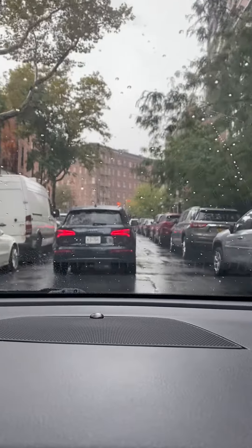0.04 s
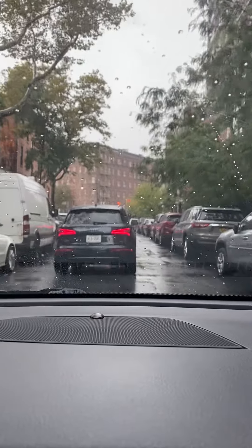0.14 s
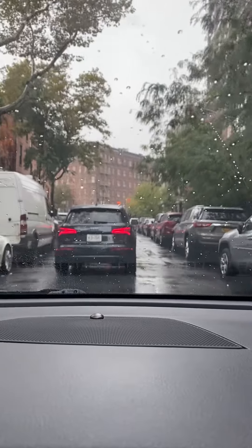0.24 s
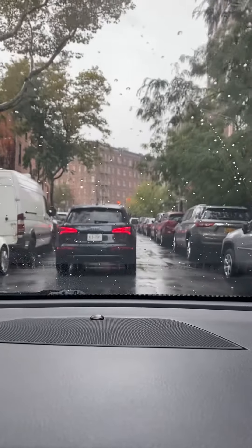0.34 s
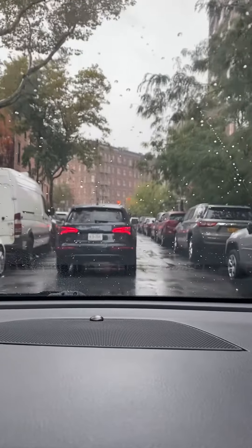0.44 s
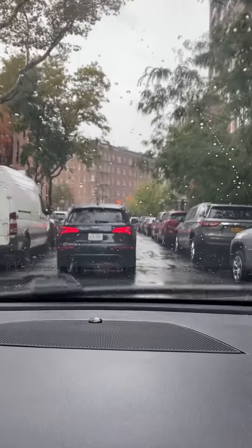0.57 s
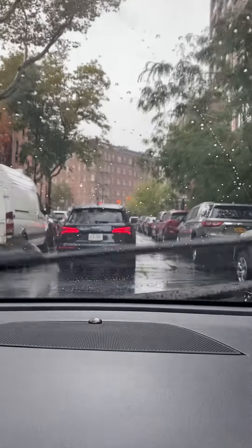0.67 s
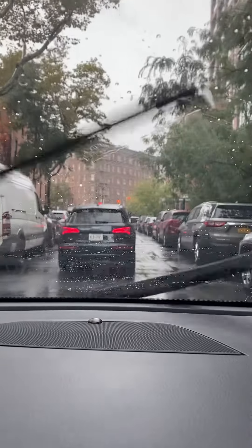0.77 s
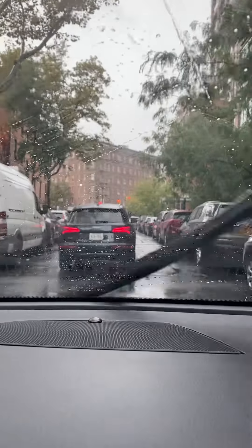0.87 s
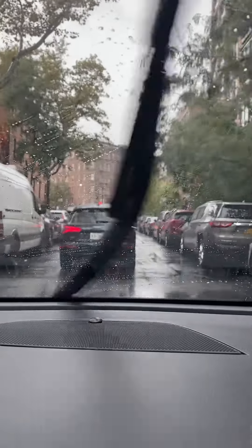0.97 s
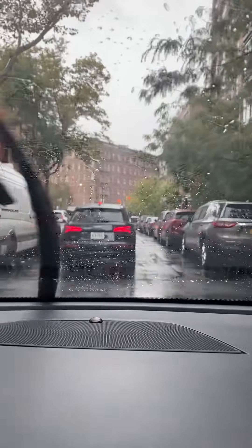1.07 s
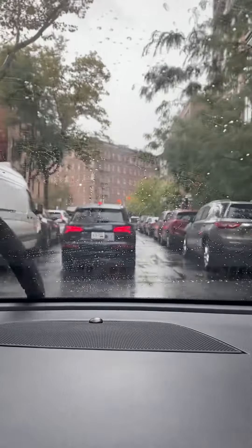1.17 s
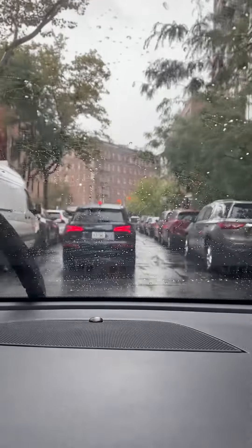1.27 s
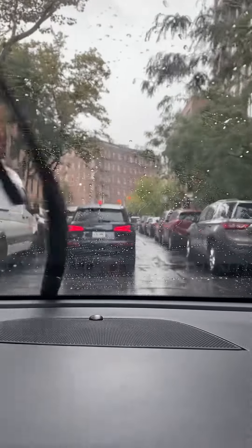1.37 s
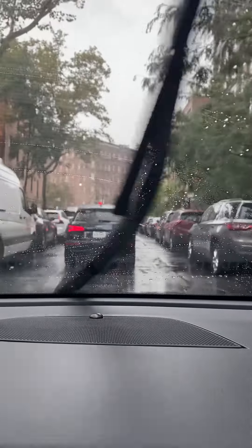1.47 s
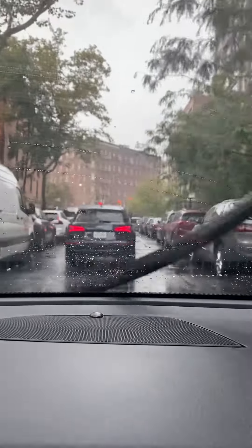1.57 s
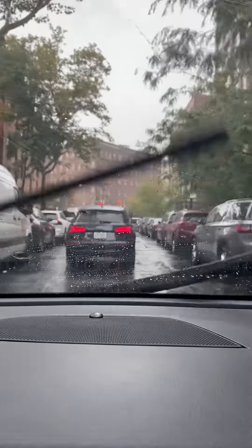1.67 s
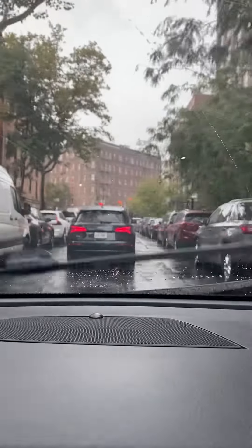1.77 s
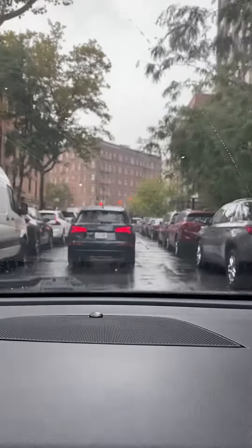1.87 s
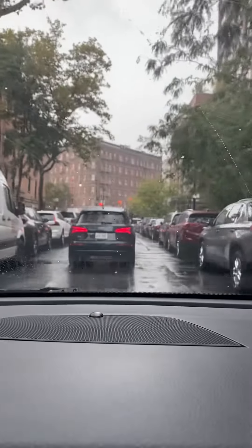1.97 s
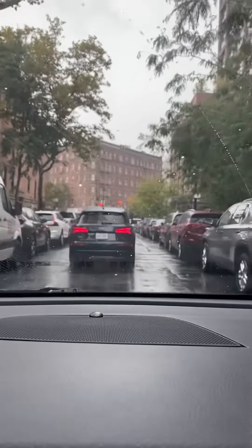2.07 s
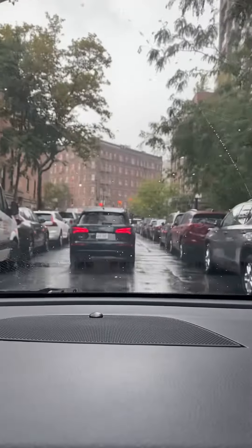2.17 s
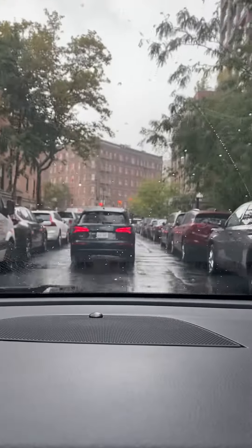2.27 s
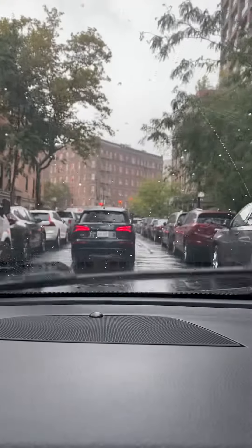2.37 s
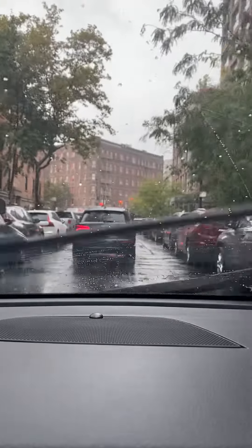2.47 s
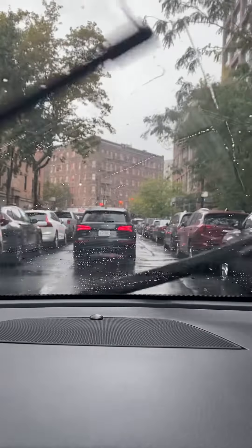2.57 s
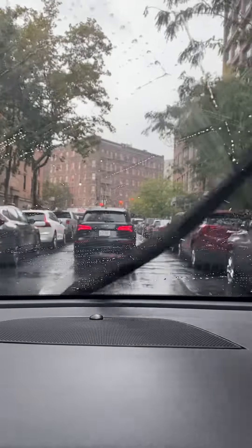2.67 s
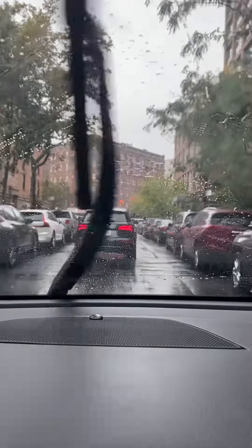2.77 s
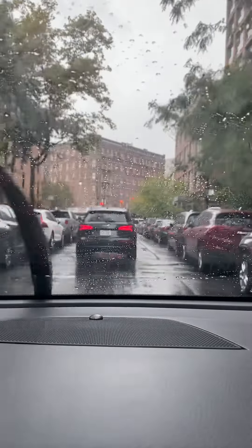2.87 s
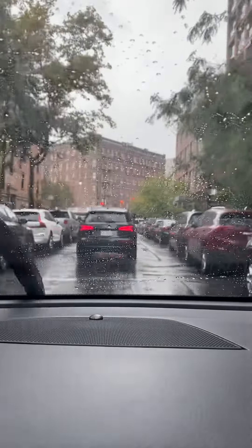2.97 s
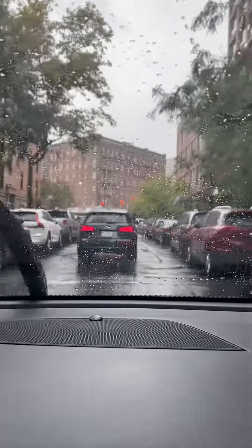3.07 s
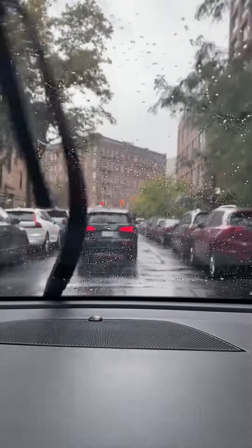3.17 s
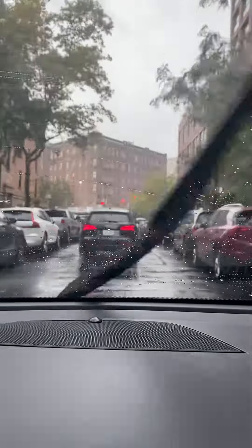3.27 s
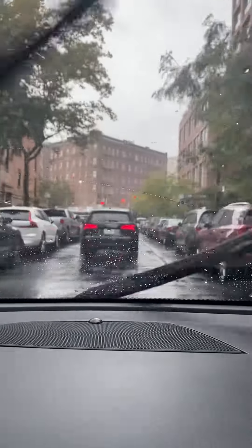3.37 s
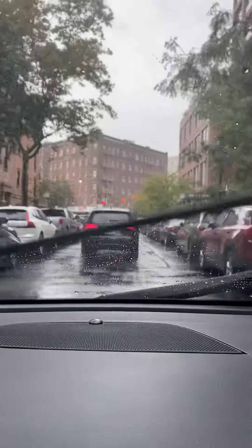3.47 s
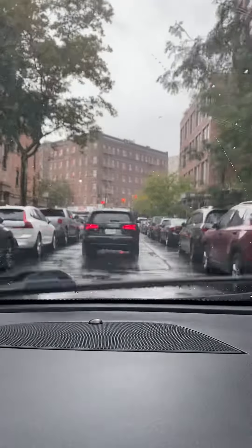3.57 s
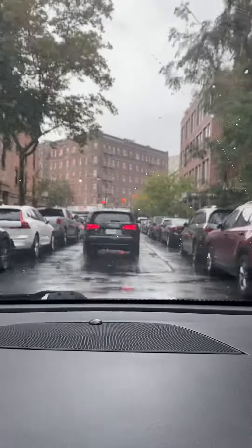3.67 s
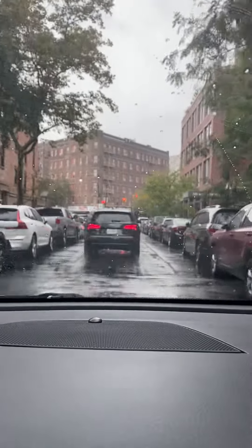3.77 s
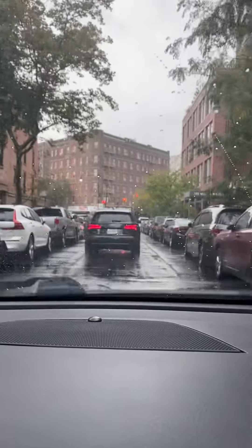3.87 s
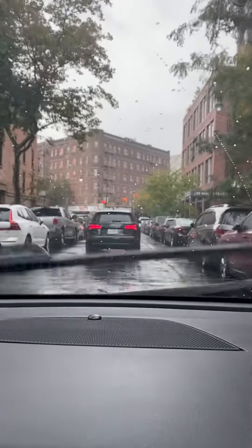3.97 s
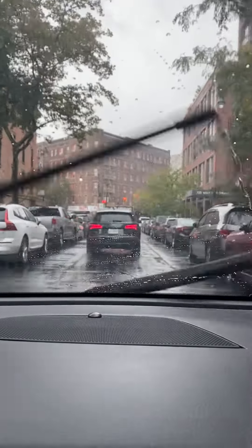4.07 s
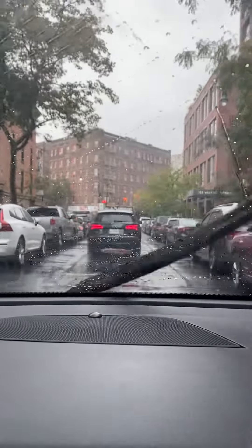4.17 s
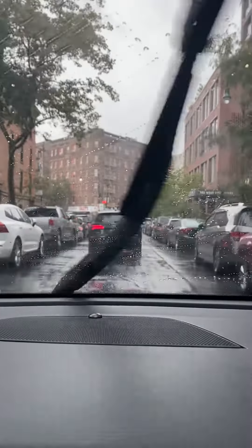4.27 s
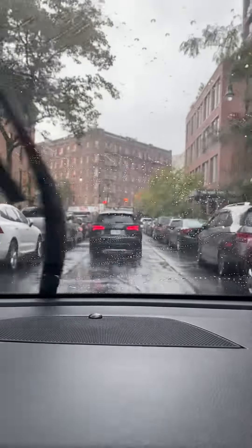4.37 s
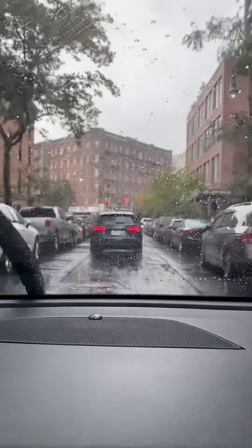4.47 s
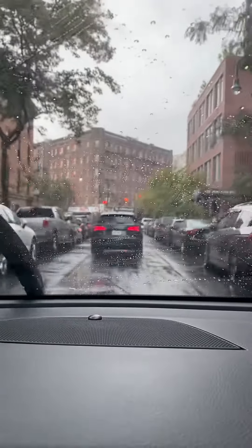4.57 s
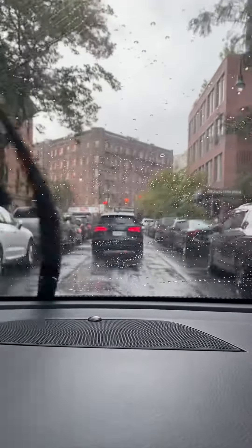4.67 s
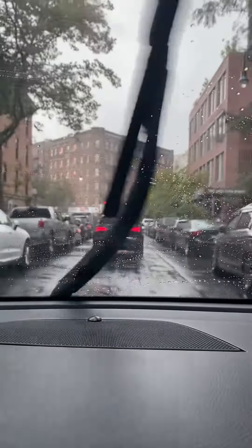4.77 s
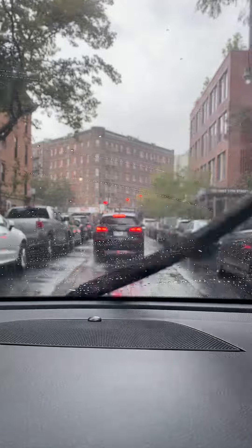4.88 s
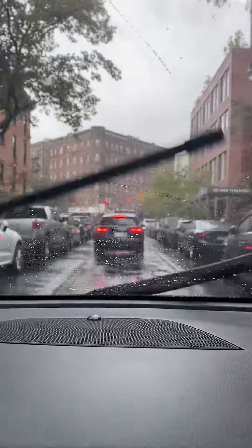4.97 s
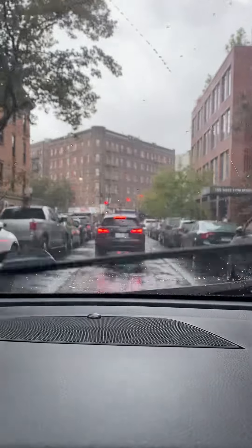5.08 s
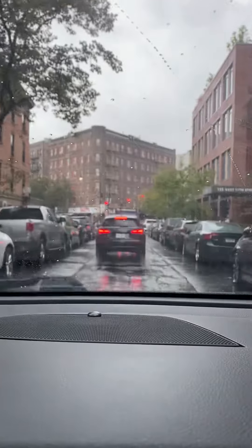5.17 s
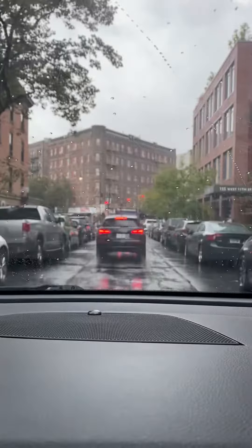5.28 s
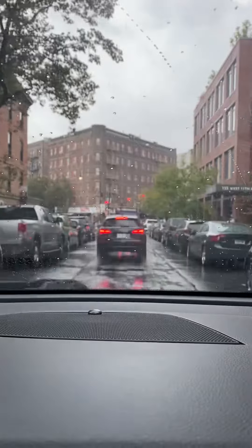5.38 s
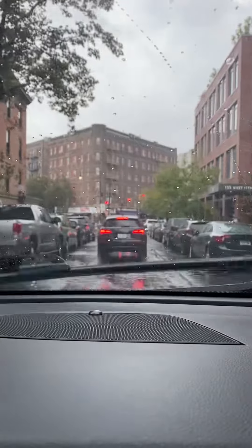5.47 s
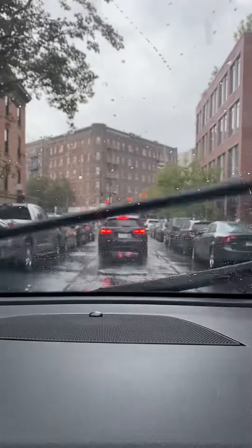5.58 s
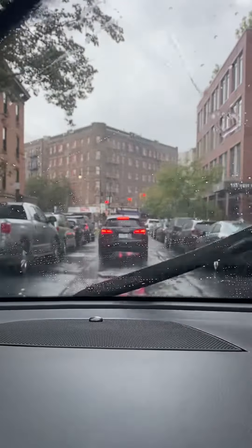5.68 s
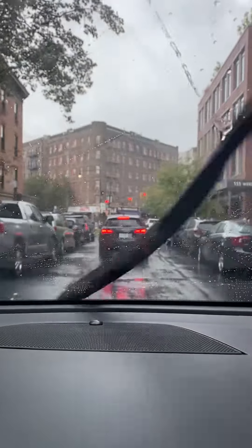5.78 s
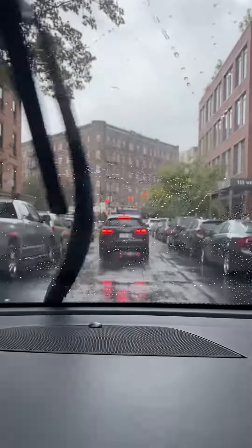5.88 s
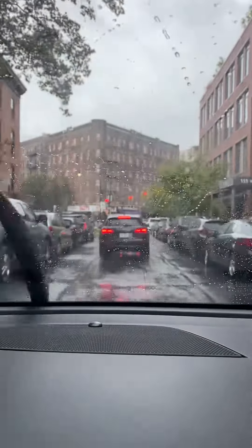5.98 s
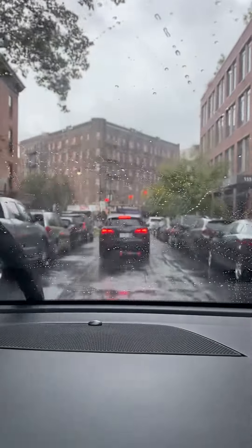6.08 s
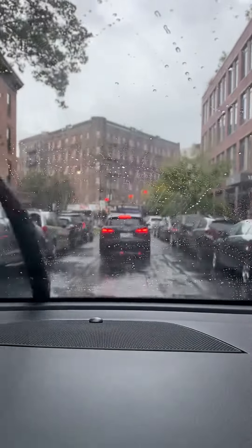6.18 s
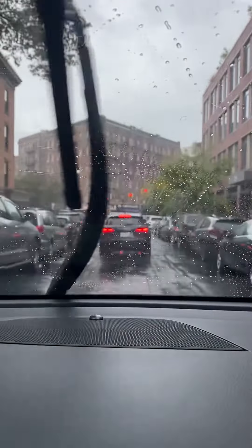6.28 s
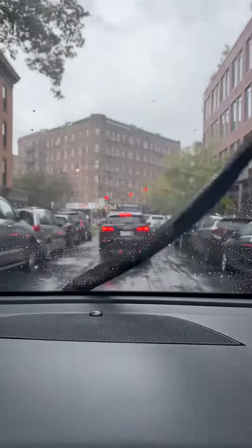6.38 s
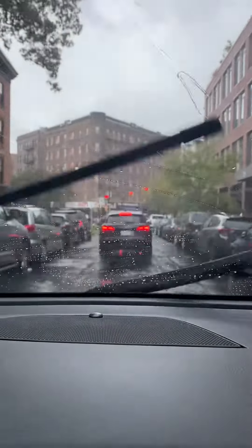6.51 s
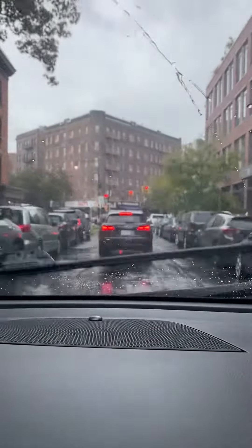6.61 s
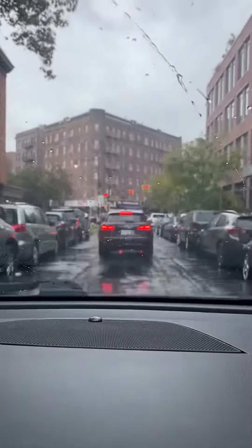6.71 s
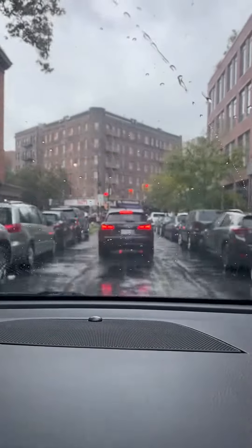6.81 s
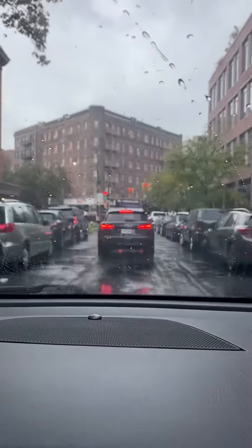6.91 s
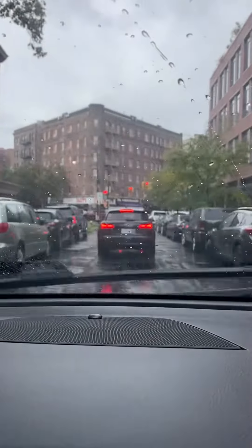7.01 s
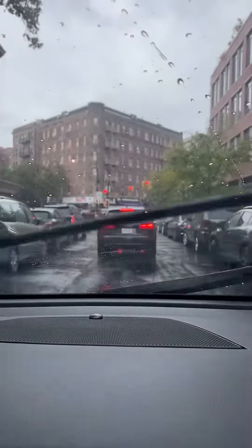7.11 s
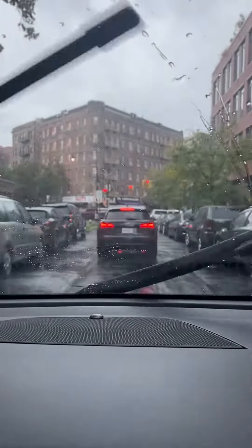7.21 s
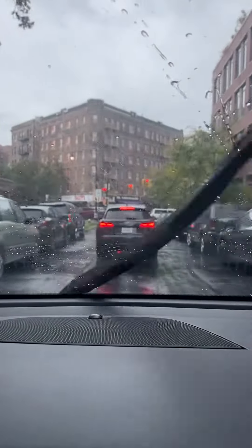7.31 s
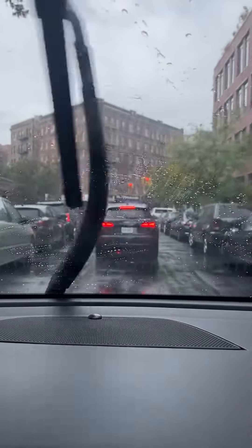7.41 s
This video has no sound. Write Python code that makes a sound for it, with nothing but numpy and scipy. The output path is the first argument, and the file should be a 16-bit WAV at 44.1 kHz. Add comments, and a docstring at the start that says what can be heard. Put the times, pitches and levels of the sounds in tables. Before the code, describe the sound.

Inside a closed car creeping along a rainy street, a soft deep engine and road rumble with a lumpy drone runs throughout, under faint fine rain that gradually grows. From 0.5 to 1.2 seconds the wipers judder over the windscreen: around ten quick rubbery slips, low groaning glass resonance near 250 hertz sinking slightly, with watery hiss and a faint motor hum. Similar sweeps come at 2.3-3.0, 3.85-4.5, 5.4-6.0 and from 6.9 to the end; the last is weaker in scrape and opens with a tiny honk at 7.0. Between sweeps there is only rumble, rain and isolated drops ticking on the glass, clearer near 1.6, 2.9 and 5.3. Low bumps thump at 1.6, 4.4, 5.65-5.9, 6.25 and 7.05, with small dull knocks at 1.8 and 6.95. Close, dry stereo perspective with a very short padded cabin tail.

```python
"""Inside a car creeping through a wet street: on each sweep the wiper blades judder over the glass in quick
slips, a low rubbery groan with a watery hiss. Noise, swelling slip by slip, drives ringing modes of the pane.
Under it, noise through low cabin modes makes the rumble, patchy coloured noise the drone and rain wash, and
noise bursts the large drops on the windscreen. Dying sines thump as bumps; faint hums and knocks pass.
A pair of close microphone ports hears it all."""
import sys
import numpy as np
from scipy import signal
from scipy.fft import rfft, irfft
from scipy.io import wavfile
from scipy.ndimage import uniform_filter1d

SR = 44100
rng = np.random.default_rng(int(sys.argv[2]) if len(sys.argv) > 2 else 0)


def field_ratio(decibels):
    """Amplitude ratio for a level in dB (20 dB per decade); scalars and array-likes work."""
    return 10 ** (np.asarray(decibels, dtype=float) / 20)


def wrap_up_sound(samples):
    """Save the sound to the file named by the first command line argument, as 16-bit audio."""
    columns = np.atleast_2d(samples).T
    # keep every value between -1 and 1, then stretch to whole-number steps
    tamed = np.clip(columns, -1, 1)
    steps = np.round(tamed * 32767).astype(np.int16)
    wavfile.write(sys.argv[1], SR, steps)


N = 328545
TIME = np.arange(N) / SR
HZ = np.fft.rfftfreq(N, 1 / SR)

# Slips of the blades, levels before the final mix:
# (time of middle [s], half length [s], scrape level [dB], glass ring level [dB])
SLIPS = [(0.5, 0.03, -53.5, -36), (0.544, 0.011, -35, -27.5), (0.605, 0.029, -24.5, -22),
         (0.68, 0.026, -27, -14), (0.776, 0.038, -30, -17.5), (0.858, 0.029, -38, -17.5),
         (0.959, 0.041, -30.5, -17.5), (1.018, 0.0073, -29.5, -14.5), (1.071, 0.056, -32.5, -22),
         (1.134, 0.031, -28, -22.5), (1.189, 0.021, -30, -27.5), (2.301, 0.014, -46, -33),
         (2.335, 0.021, -42.5, -40), (2.382, 0.029, -25, -19.5), (2.459, 0.03, -29, -16),
         (2.544, 0.033, -28, -14.5), (2.614, 0.025, -32.5, -23), (2.701, 0.032, -31, -23.5),
         (2.735, 0.042, -31.5, -26.5), (2.812, 0.054, -30, -21), (2.891, 0.022, -27, -17),
         (2.946, 0.03, -28, -20), (3.846, 0.015, -42, -35.5), (3.921, 0.031, -24.5, -20),
         (3.999, 0.032, -28, -14), (4.096, 0.036, -28.5, -16), (4.175, 0.022, -32.5, -18.5),
         (4.289, 0.063, -28, -24), (4.403, 0.048, -29.5, -20), (4.459, 0.03, -28, -15.5),
         (4.514, 0.015, -42, -34), (5.375, 0.014, -44, -55), (5.417, 0.015, -36, -37),
         (5.47, 0.025, -22, -38.5), (5.555, 0.041, -29.5, -16.5), (5.653, 0.035, -29, -17),
         (5.739, 0.027, -33.5, -27), (5.82, 0.041, -31, -18), (5.864, 0.026, -29, -22.5),
         (5.924, 0.037, -28.5, -20.5), (6.002, 0.037, -27, -27), (6.925, 0.016, -47, -50),
         (7.005, 0.012, -26.5, -27), (7.033, 0.0089, -38, -30.5), (7.078, 0.024, -33.5, -18.5),
         (7.148, 0.013, -44, -33), (7.172, 0.064, -39, -27), (7.259, 0.045, -39.5, -33),
         (7.313, 0.022, -38, -21), (7.346, 0.0076, -33, -33), (7.395, 0.059, -35, -23)]
# Sweeps of the blades: (time of first full slip [s], water on the glass [dB],
# hum of the wiper motor [dB], first ring of the glass [Hz])
SWEEPS = [(0.608, -0.5, -32, 250.2), (2.385, -1, -25.5, 270.8), (3.922, -1, -27, 275.3),
          (5.473, -0.5, -26.5, 259.2), (7.003, -2.5, -25, 301.2)]
# Along a sweep, against the scrape:
# (time since first full slip [s], hiss of gathering water [dB], rasp of the rubber edge [dB])
GATHER = [(-.07, -25.5, -10.5), (0, -28.5, -26), (0.079, -22.5, -13.5), (.17, -21, -22), (.25, -24, -24),
          (.35, -20, -22), (0.601, -23.5, -19.5)]
# Spectrum of the rubber's scrape: (frequency [Hz], relative level per hertz [dB])
SCRAPE_SPECTRUM = [(90, -0.5), (200, -3.5), (450, -1), (600, -6), (900, -9.5), (1250, -13.5), (1550, -21),
                   (2000, -27.5), (2500, -31.5), (3000, -41.5), (4000, -56.5)]
# Spectrum of the squeezed water: (frequency [Hz], relative level per hertz [dB])
HISS_SPECTRUM = [(1500, -9.5), (2800, 3.5), (3800, 3), (5500, 0.5), (7000, -3.5), (8500, -8.5),
                 (10000, -18.5), (12000, -17), (14000, -30), (16000, -44)]
# Fixed modes of the pane, against the scrape: (frequency [Hz], width of each filter pass [Hz], level [dB])
PANE_MODES = [(247, 30, -3), (802, 60, -12)]
SWEEP_S, LEAD_S = 0.568, 0.15  # sweep length, and how long before its first full slip the blades creep [s]


def wipers():
    """Stick-slip friction: each slip swells and stops, scraping, ringing the glass and squeezing water out."""
    rise, stop = 2.7, 4.5  # exponents of the swell before and after its middle
    snap_db, snap_s = -6, 0.0022  # power of the snap and its decay time [s]
    drag_db, seep_db = -17, -16  # slow movement around a slip, in power
    sag_per_s = 0.85  # rate at which the ring falls during a sweep [1/s]
    slip_s, half_s, scrape_db, ring_db = np.transpose(SLIPS)
    sweep, since = sweep_at(slip_s)
    _, water_db, _, first_hz = np.transpose(SWEEPS)[:, sweep]
    into, gathered_db, rasp_db = np.transpose(GATHER)
    ring_hz = first_hz * np.exp(-sag_per_s * since)
    hiss_db = scrape_db + water_db + np.interp(since, into, gathered_db)

    power = np.zeros((3, N // 32 + 1))  # scrape, ring and hiss
    t = np.arange(power.shape[1]) * 32 / SR
    for k in range(len(slip_s)):
        u = abs(t - slip_s[k]) / max(half_s[k], 0.005)
        sharp = np.where(t < slip_s[k], rise, stop)  # a slip builds up, then the rubber grips at once
        creep = field_ratio([[drag_db], [drag_db], [seep_db]]) * np.exp(-(u / 1.22) ** 4)
        swell = np.exp(-2 * u ** sharp) + creep
        freed = t - slip_s[k] + 0.85 * half_s[k]  # the edge tears free with a snap
        swell[::2] += field_ratio(snap_db) * (freed > 0) * np.exp(-abs(freed) / snap_s)
        power += field_ratio([[scrape_db[k]], [ring_db[k]], [hiss_db[k]]]) ** 2 * swell
    scrape, ring, hiss = (np.interp(TIME, t, np.sqrt(p)) for p in power)

    hz = np.interp(TIME, slip_s, ring_hz)
    hz *= 1 + 0.06 * evened(uniform_filter1d(rng.standard_normal(N), 1800))  # wanders with the grip
    pulses = catches(hz, jitter=0.12)
    groan = resonate(ring * (grit(60, 1.5) + field_ratio(-24) * pulses), hz, width_hz=120)

    scraping = patchy(grit(220, 2.9), 3.95) + field_ratio(-10) * pulses
    rub = coloured(scrape * scraping, SCRAPE_SPECTRUM)
    tight_db = np.interp(TIME, slip_s, np.interp(since, into, rasp_db))
    rasp = scrape * field_ratio(tight_db) * patchy(grit(150, 2.4), 3.0)
    rub += resonate(rasp, np.full(N, 2050.0), 1100)
    for mode_hz, width_hz, db in PANE_MODES:
        rub += field_ratio(db) * resonate(scrape * grit(40, 1.6), np.full(N, mode_hz), width_hz)

    water = coloured(hiss * patchy(grit(450, 2.65), 2.2), HISS_SPECTRUM)
    return rub + field_ratio(-5.0) * groan + field_ratio(1.55) * water


# Steady honks of the rubber: (time of middle [s], half length [s], level [dB], pitch [Hz])
HONKS = [(7.007, 0.0058, -23, 296), (5.475, 0.039, -29, 170)]
# Harmonics of a honk: (multiple of the pitch, level against the honk [dB])
HONK_HARMONICS = [(1, -4.5), (2, -9), (3, -5), (4, -4.5), (5, -22), (6, -27.5), (7, -29)]


def honks():
    """Periodic vibration: a short stack of harmonics on a steady pitch under a smooth swell."""
    out = np.zeros(N)
    for middle_s, half_s, db, hz in HONKS:
        t = TIME - middle_s
        stack = np.zeros(N)
        for multiple, tone_db in HONK_HARMONICS:
            turns = round(multiple) * hz * t + rng.random()
            stack += field_ratio(tone_db) * np.cos(2 * np.pi * turns)
        out += field_ratio(db) * np.exp(-abs(t / half_s) ** 3) * stack
    return out


# Cabin modes shaken by road, engine and wiper motor: (frequency [Hz], width of each filter pass [Hz])
CABIN_MODES = [(46, 26.7), (76, 40.4), (118, 53)]
# The car under way: (time [s], engine effort [dB], roughness of the road [dB])
DRIVE = [(0.0, -10, -3), (0.401, -4, -6.5), (0.909, 0.5, -9.5), (1.799, -2, 1.5), (2.92, 0.5, -3.5),
         (3.46, -2, 8.5), (3.8, -1.5, -8), (4.34, 0.5, 2.5), (5.44, 2, -0.5), (5.56, -0.5, 5),
         (6.3, 3, -0.5), (7.12, 1.5, 3.5), (7.35, 0.5, 11.5), (7.45, -15, -15.5)]


def body():
    """Forced vibration of modes: road, engine and wiper motor each shake one low mode of the cabin."""
    rumble_db, boom_db, idle_hum_db = -31.5, -30.5, -38.5
    hum_rise_s, hum_fall_s = 0.59, 0.15
    hum_lift_hz = 21.5  # climb of the hum while the wiper motor works fully
    s, effort_db, road_db = np.transpose(DRIVE)
    sweep, since = sweep_at(TIME)
    starting = (since + LEAD_S) / hum_rise_s
    stopping = 1 + (SWEEP_S - since) / hum_fall_s
    working = np.clip(np.minimum(starting, stopping), 0, 1)
    effort = field_ratio(np.interp(TIME, s, effort_db))
    rumble = field_ratio(rumble_db + np.interp(TIME, s, road_db))
    boom = field_ratio(boom_db) * effort
    hum = np.hypot(field_ratio(idle_hum_db) * effort, working * field_ratio(np.transpose(SWEEPS)[2][sweep]))
    modes = np.zeros((2, N))
    for (hz, width_hz), level, lift_hz in zip(CABIN_MODES, (rumble, boom, hum), (0, 0, hum_lift_hz)):
        modes += level * resonate(rng.standard_normal((2, N)), hz + lift_hz * working, width_hz)
    return signal.lfilter(*signal.butter(2, 30, "high", fs=SR), modes)


# Bumps in the road: (time [s], level before rise and decay [dB], frequency [Hz], 60 dB decay time [s])
BUMPS = [(1.635, -13.5, 69.2, .2), (1.723, -28.5, 45.3, 0.58), (4.37, -17, 44.3, .25),
         (5.653, -10.5, 103, 0.12), (5.701, -11.5, 44.4, .25), (5.921, -18.5, 83.3, 0.49),
         (6.259, -14, 51.6, 0.89), (7.061, -9.5, 76.8, .12)]


def bumps():
    """Damped oscillation: each bump thumps the cabin air into a low swing that dies away."""
    out, t = np.zeros(N), np.arange(15000) / SR
    for s, db, hz, t60 in BUMPS:
        envelope = field_ratio(db - 60 * t / t60) * np.minimum(t / 0.012, 1)
        thump = envelope * np.sin(2 * np.pi * hz * t)
        part = out[round(s * SR):][:len(t)]
        part += thump[:len(part)]
    return out


# Large drops on the windscreen: (time [s], level [dB], dull part against the bright noise [dB],
# splash length [ms], frequency the glass answers at [Hz])
DROPS = [(0.519, -50.5, 9.5, 1.7, 1490), (0.766, -47, 7.5, 4.2, 1600), (0.949, -40, 7.5, 2.2, 1390),
         (1.285, -51, 5, 24.5, 1600), (1.465, -53, -18, 16, 1400), (1.553, -42, 4, 2, 1200),
         (1.607, -37.5, 1, 4.4, 2350), (1.985, -65.5, 7, 10, 2600), (2.016, -55, 3.5, 23, 1960),
         (2.157, -43.5, -3, 25.7, 1800), (2.297, -52, 14, 1.3, 1520), (2.775, -39, -8.5, 3, 2400),
         (2.878, -34.5, -1.5, 3.5, 2160), (4.067, -50.5, 1, 2.7, 1400), (4.089, -40, -13, 2, 1400),
         (4.241, -41.5, -0.5, 5.6, 1800), (4.36, -39.5, -3.5, 2.1, 2400), (5.25, -51, 1, 6, 1300),
         (5.293, -35, -10.5, 6.5, 1000), (5.58, -35, -12, 11, 2760), (5.625, -39.5, 6.5, 2.9, 1500),
         (5.743, -39, -1, 16, 2400), (5.978, -47, 15, 3, 1380), (6.085, -52, 0, 24, 2340),
         (6.124, -53, 3.5, 15, 2330), (6.921, -49, 6, 4.2, 1670), (6.939, -43.5, 4.5, 1.7, 2380),
         (7.071, -47, 5.5, 5.6, 2170), (7.128, -54, 18.5, 3.3, 1430), (7.202, -45.5, 7.5, 4, 1380)]
# Spectrum of a drop's bright part: (frequency [Hz], relative level per hertz [dB])
TAP_SPECTRUM = [(500, 1), (1500, -2), (2800, 0.5), (5000, 1.5), (8000, -8), (11000, -15), (15000, -19.5),
                (16000, -45.5)]


def drops():
    """Impact and reverberation: a splash strikes the pane, then the padded cabin's quick tail dies away."""
    cabin_db, cabin_t60 = -13, 0.12  # tail against the splash, and its 60 dB decay time [s]
    dull_width_hz = 1870  # width of each filter pass
    thud_hz, thud_width_hz, thud_db = 755, 1000, -1.5  # the pane's thud, against the dull part
    ms = np.arange(6000) * 1000 / SR
    bright, dull = np.zeros((2, 2, N + len(ms)))
    for s, db, dull_db, length_ms, hz in DROPS:
        splash = np.minimum(ms / (0.18 * length_ms), 1) * np.exp(-(ms / length_ms) ** 2)
        tail = field_ratio(cabin_db - 60 * ms / 1000 / cabin_t60) * np.minimum(ms / length_ms, 1)
        sound = field_ratio(db) * np.hypot(splash, tail) * rng.standard_normal((2, len(ms)))
        answer = resonate(sound, np.full(len(ms), hz), dull_width_hz)
        thud = resonate(sound, np.full(len(ms), thud_hz), thud_width_hz)
        at = slice(round(s * SR), round(s * SR) + len(ms))
        bright[:, at] += sound
        dull[:, at] += answer * field_ratio(dull_db) + thud * field_ratio(dull_db + thud_db)
    return coloured(bright[:, :N], TAP_SPECTRUM) + dull[:, :N]


# Knocks: (time [s], level [dB], frequency [Hz])
KNOCKS = [(1.775, -44, 785), (6.964, -32.5, 470)]


def knocks():
    """Impulsive excitation of a broad resonance: short, dull rings."""
    out, t = np.zeros((2, N)), np.arange(6000) / SR
    for s, db, hz in KNOCKS:
        envelope = field_ratio(db - 60 * t / 0.14) * np.minimum(t / 0.0018, 1)  # 60 dB in 0.14 s
        burst = envelope * rng.standard_normal((2, len(t)))
        out[:, round(s * SR):][:, :len(t)] += resonate(burst, np.full(len(t), hz), width_hz=300)
    return out


# Faint hums: (start [s], length [s], frequency [Hz], width of each filter pass [Hz], level [dB])
HUMS = [(0.117, 0.83, 114, 12, -35), (2.121, 0.33, 380, 30, -48.5)]


def hums():
    """Narrow-band noise: fuzzy tones that fade in and out."""
    out = np.zeros((2, N))
    for s, length_s, hz, width_hz, db in HUMS:
        t = np.arange(0, length_s, 1 / SR)
        fuzz = resonate(rng.standard_normal((2, N))[:, :len(t)], np.full(len(t), hz), width_hz)
        fade = np.minimum(np.minimum(t, length_s - t) / 0.055, 1)
        out[:, round(s * SR):][:, :len(t)] += field_ratio(db) * fade * fuzz
    return out


# Spectrum of the low drone: (frequency [Hz], relative level per hertz [dB])
DRONE_SPECTRUM = [(100, 2.5), (140, -9.5), (190, -6), (260, -10.5), (350, -18.5), (550, -25.5),
                  (900, -38.5)]
# Spectrum of the rain: (frequency [Hz], relative level per hertz [dB])
RAIN_SPECTRUM = [(300, 1.5), (600, 0), (1000, -1), (2000, -6), (4500, -13.5), (5800, -17), (7000, -20),
                 (9000, -26), (11500, -28), (14000, -30.5), (16000, -63)]


def street():
    """Superposed random sources: a lumpy low drone, and a wash of fine rain with small drops pattering."""
    s, effort_db, _ = np.transpose(DRIVE)
    drone_db = -39 + 1.04 * effort_db
    rain_db = -56 + 0.42 * effort_db + 0.5 * (s - s.mean())  # rain grows by 0.5 dB/s besides effort
    drone = coloured(patchy(grit(27, 1.6), 2.0), DRONE_SPECTRUM)
    struck = rng.random(N) < 25 / SR  # 25 small drops a second on average
    taps = struck * field_ratio(0.43 * np.minimum(rng.exponential(1, N), 3) - 5)
    patter = signal.lfilter([1], [1, -np.exp(-1 / (0.022 * SR))], taps ** 2)  # power decays over 22 ms
    rain = coloured(patchy(grit(12, 0.86), 2.2) * np.sqrt(1 + patter), RAIN_SPECTRUM)
    return drone * field_ratio(np.interp(TIME, s, drone_db)) + rain * field_ratio(np.interp(TIME, s, rain_db))


def sweep_at(s):
    """Periodic motion: which sweep the times s fall in, and the seconds since its first full slip."""
    start = np.transpose(SWEEPS)[0]
    k = np.maximum(np.searchsorted(start - LEAD_S, s) - 1, 0)
    return k, s - start[k]


def catches(hz, jitter, count=9):
    """Stick-slip cycle: the edge sticks and lets go about once per swing of the glass, in uneven pulses."""
    wander = evened(uniform_filter1d(rng.standard_normal((2, N)), 300))
    turns = np.cumsum(hz * (1 + jitter * wander), axis=1) / SR
    return evened(sum(np.cos(2 * np.pi * k * turns) for k in range(1, count + 1)))


def grit(hz, depth_db):
    """Amplitude modulation: two unrelated noises share one uneven roughness, as from many small catches."""
    lumps = evened(uniform_filter1d(rng.standard_normal(N), int(SR / hz)))
    return evened(rng.standard_normal((2, N)) * field_ratio(depth_db * lumps))


def patchy(x, depth_db):
    """Time-varying filtering: resonant lumps come and go across the spectrum, alike in both channels."""
    z = signal.stft(x, nperseg=1024, noverlap=768)[2]
    lumps = uniform_filter1d(rng.standard_normal(z.shape[1:]), size=3, axis=0)
    lumps = uniform_filter1d(lumps, size=7, axis=1)
    shaped = z * evened(field_ratio(depth_db * evened(lumps)))
    return signal.istft(shaped, nperseg=1024, noverlap=768)[1][:, :N]


def resonate(x, hz, width_hz):
    """Resonance: a moving one-pole pair of passes that keeps the power of white noise."""
    turn = np.exp(2j * np.pi * np.cumsum(hz) / SR)
    r = np.exp(-np.pi * width_hz / SR)
    low = signal.lfilter([(1 - r) ** 2], [1, -2 * r, r * r], x / turn)
    return (turn * low).real * np.sqrt(8 / (1 - r))


def coloured(x, points):
    """Linear filtering: shapes a spectrum, keeps white noise power and fades steeply outside the table."""
    hz, db = np.transpose(points)
    edges_hz = [hz[0] / 2, *hz, hz[-1] * 2.1]
    shape = field_ratio(read(edges_hz, [db[0] - 62.0, *db, db[-1] - 55.0]))
    return irfft(rfft(x) * evened(shape), N)


def read(hz, value):
    """Logarithmic frequency scale: interpolates a spectrum onto the transform's frequencies."""
    return np.interp(np.log(HZ + 1), np.log(np.asarray(hz) + 1), value)


def evened(x):
    """Power normalisation: scales to rms 1."""
    return x / np.sqrt(np.mean(x ** 2) + 1e-20)


def scene():
    """Superposition: two mostly unrelated sound paths; honks and bumps take both alike."""
    return wipers() + honks() + body() + bumps() + street() + drops() + knocks() + hums()


def band_limit(x):
    """A steep low-pass at the top of the band."""
    return signal.sosfilt(signal.butter(12, 15700, fs=SR, output="sos"), x)


# The two ports: (frequency [Hz], likeness [0 to 1], phase lead of the left [rad], left over right [dB])
PORTS = [(30, .99995, 0, 0), (80, .9992, 0, -.1), (200, .9955, 0, -.6), (350, .97, -.1, -1),
         (520, .81, .2, -.4), (700, .6, .6, 0), (860, .27, -.4, 1.6), (1200, .6, 0, 1), (1850, .94, .2, .2),
         (2600, .5, 1.2, -1.2), (3000, .6, 1.4, -1.6), (3900, .63, .8, -.8), (4500, .6, 1.5, -1),
         (4800, .8, 3.1, -2), (5200, .6, 5.5, .8), (5700, .86, 6.8, .6), (7000, .78, 7.5, -.4),
         (9500, .62, 8.4, -.4), (11000, .88, 9.2, 0), (12000, .86, 9.42, 0)]


def record(dry):
    """Partial coherence: the right port shares part of the left's sound, shifted in phase and level."""
    hz, like, lead, tilt_db = np.transpose(PORTS)
    like = np.clip(read(hz, like), 0, 1)
    left, other = rfft(dry)
    right = (like * left + np.sqrt(1 - like ** 2) * other) * np.exp(-1j * read(hz, lead))
    tilt = field_ratio(read(hz, tilt_db) / 2)
    mix = irfft(np.array([left * tilt, right / tilt]), N)
    return band_limit(mix)


dry = scene()
out = record(dry)
wrap_up_sound(out)
```